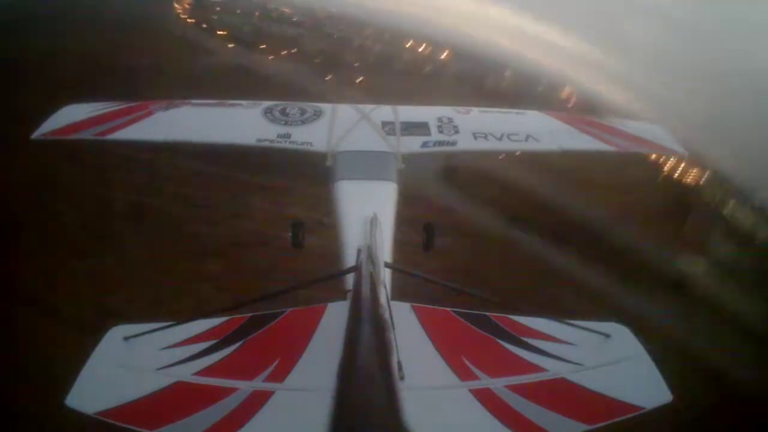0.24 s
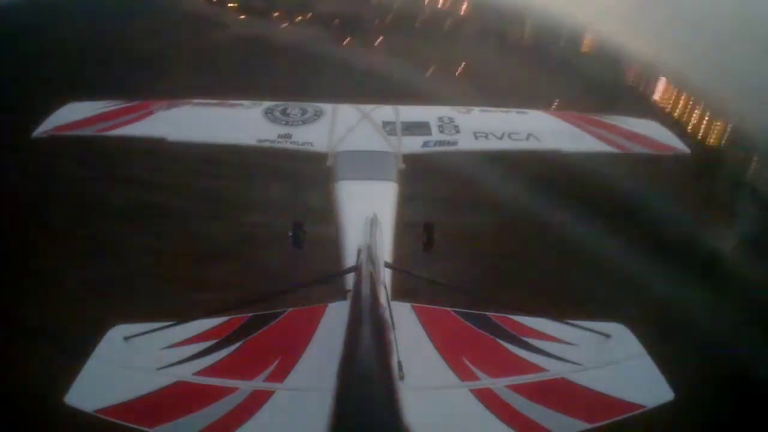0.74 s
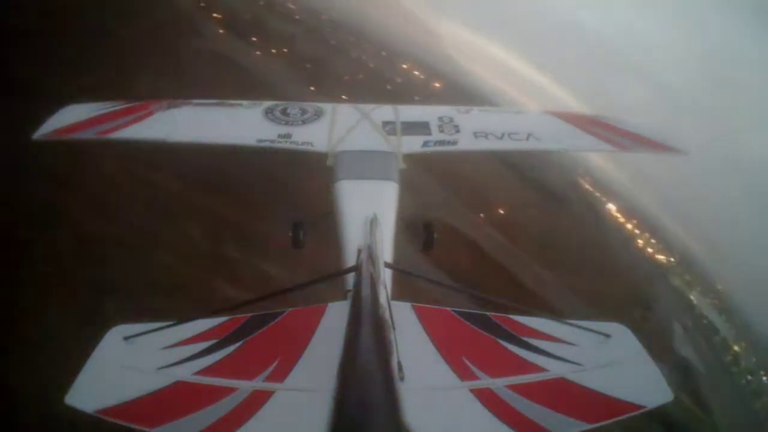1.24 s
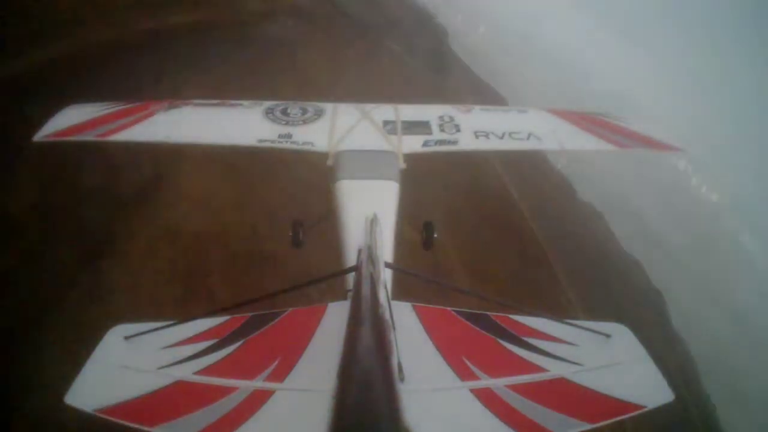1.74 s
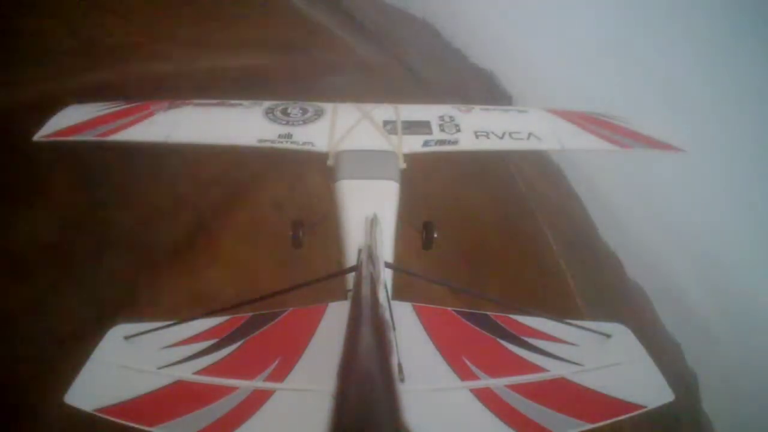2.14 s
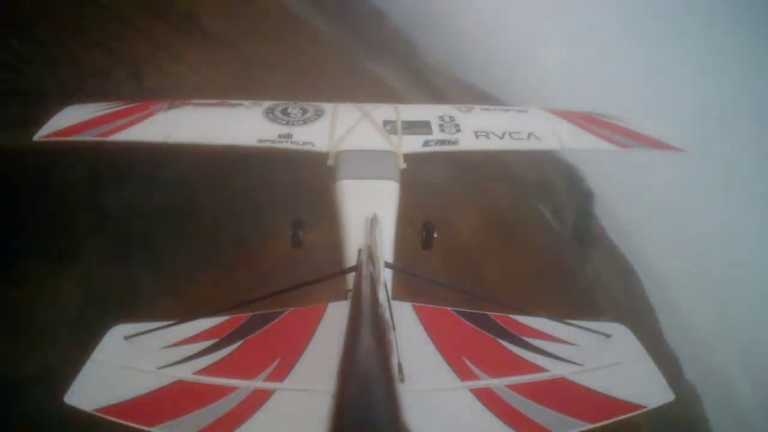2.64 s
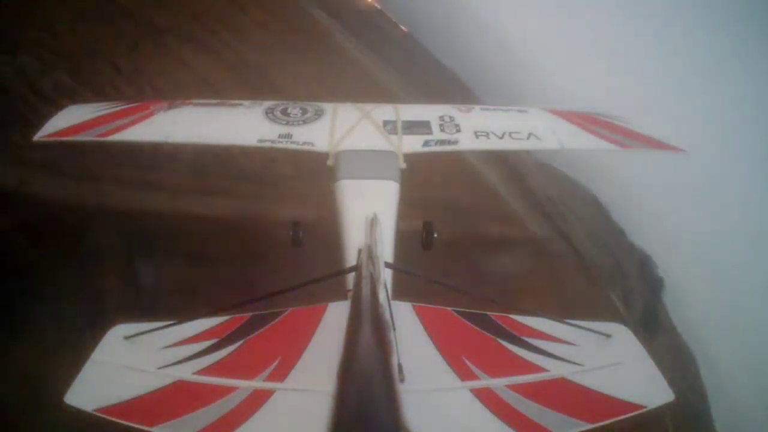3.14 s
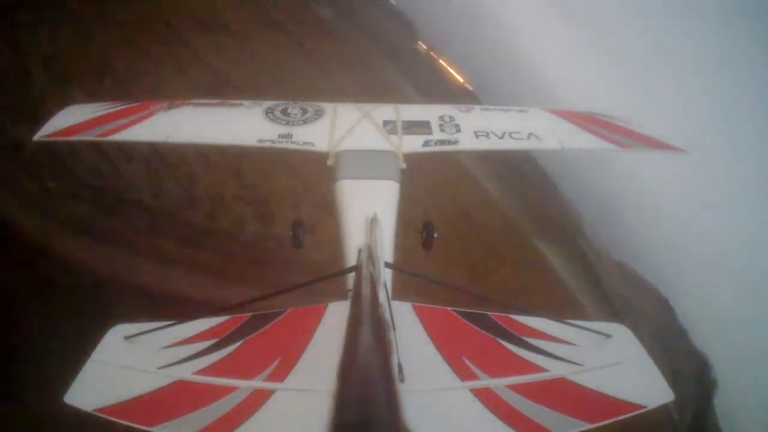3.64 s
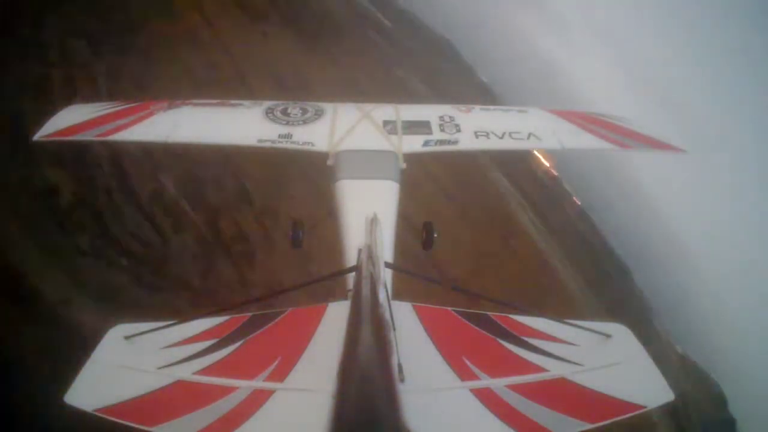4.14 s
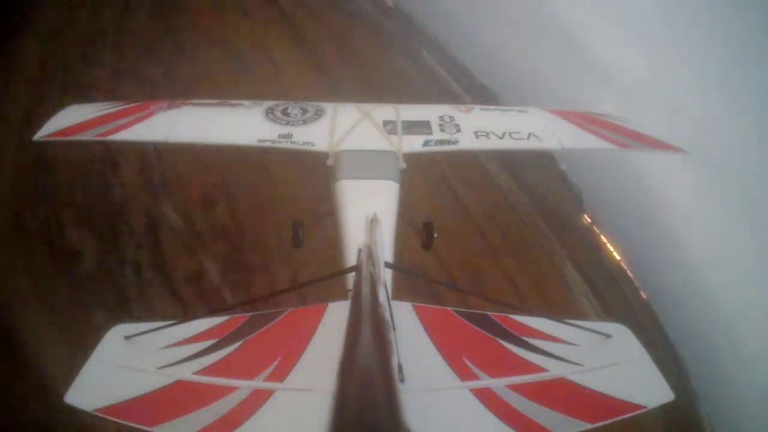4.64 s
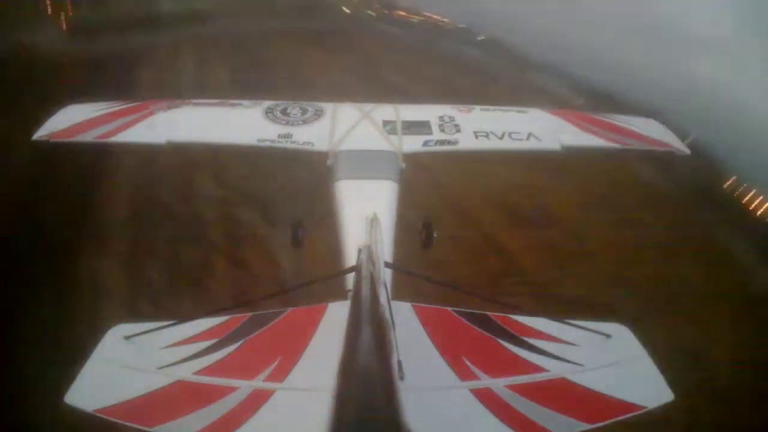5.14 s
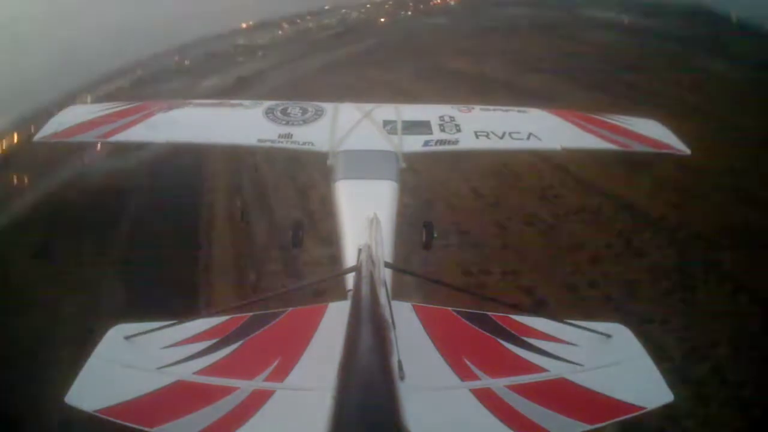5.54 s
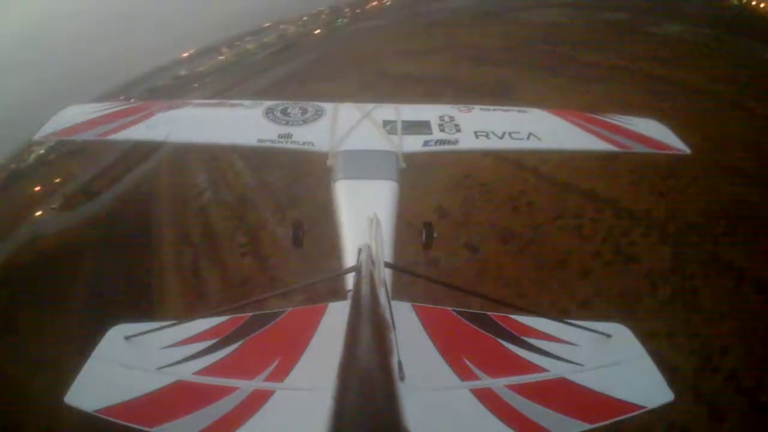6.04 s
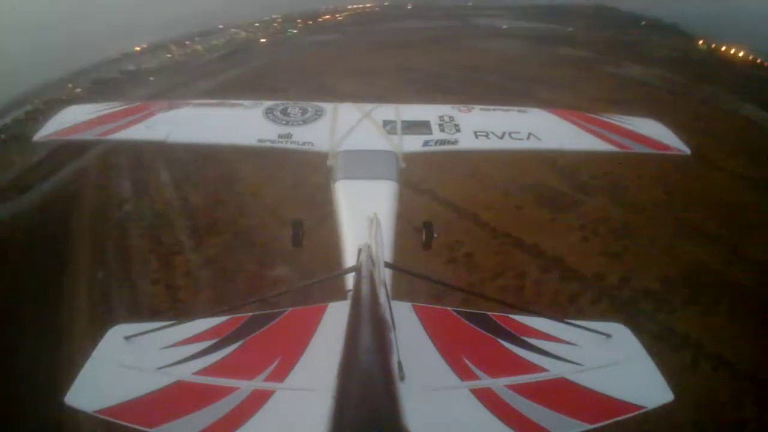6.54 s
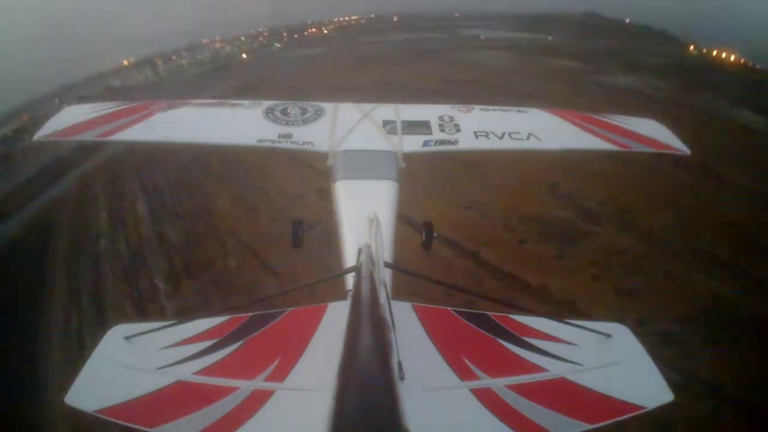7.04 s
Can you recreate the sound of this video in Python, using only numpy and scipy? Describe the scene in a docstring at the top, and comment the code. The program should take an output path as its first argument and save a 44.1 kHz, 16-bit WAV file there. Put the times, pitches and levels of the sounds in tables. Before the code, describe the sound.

An onboard microphone out in the open air catches loud propeller wash and hard, rapid clattering of a light airframe. The wash eases, the motor drops in pitch, and the clatter ends. After that, quieter flight: rumbling, fluttering wind, a gentle propeller hum, faint electric whine and hiss, and one gust that sings briefly in the airframe.

```python
"""Electric model plane in flight

Heard from a small camera on the tail: at high throttle the airframe rattles in bouts, once a shaft turn,
amid buffeting propeller wash. Then the throttle is pulled back and the rattle stops; a soft two-blade hum,
a thin controller whistle and gusty wind remain. Rattle is struck resonances and filtered ticks, hum and
whine are sines locked to one shaft angle, the whistle is a fixed sine, and the air is filtered noise.
"""
import sys
import numpy as np
from scipy import signal
from scipy.fft import rfft, irfft
from scipy.io import wavfile

SR = 44100
rng = np.random.default_rng(int(sys.argv[2]) if len(sys.argv) > 2 else 0)


def int16_out(signal):
    """Quantize to a 16-bit WAV file."""
    q = np.round(np.clip(np.atleast_2d(signal).T, -1, 1) * 32767)
    wavfile.write(sys.argv[1], SR, q.astype(np.int16))


N = 321489
TIME = np.arange(N) / SR
# shaft turns per second at high and at low throttle
FAST_HZ, SLOW_HZ = 138.85, 91.3
# the throttle is pulled back: when, and how long the shaft takes to slow
CUT_S, SPIN_DOWN_S = 1.7, 0.18


def amp(db):
    """Decibels to gain."""
    return 10 ** (np.asarray(db) / 20)


def unit(x):
    """Scales to rms 1."""
    return x / np.sqrt(np.mean(x ** 2) + 1e-20)


def curve(rows):
    """A time table, read at every sample."""
    t, value = np.transpose(rows)
    return np.interp(TIME, t, value)


def since(s):
    """Seconds gone by since a moment, zero before it."""
    return np.maximum(TIME - s, 0)


def swell(middle, length):
    """A smooth rise from 0 to 1 and back."""
    phase = np.clip((TIME - middle) / length, -0.5, 0.5)
    return np.cos(np.pi * phase) ** 2


def drift(hz):
    """Slow random wander of rms 1: noise rolled off above about the given rate."""
    f = np.fft.rfftfreq(N, 1 / SR)
    spectrum = rfft(rng.standard_normal(N)) / (1 + (f / hz) ** 4)
    return unit(irfft(spectrum, N))


def response(points, size=4096):
    """Causal, minimum-phase impulse response of energy 1 with the given colour."""
    f, db = np.transpose(points)
    hz = abs(np.fft.fftfreq(size, 1 / SR))
    log_gain = np.log(amp(np.interp(np.log(hz + 1), np.log(f), db)))
    spectrum = np.exp(np.conj(signal.hilbert(log_gain)))  # phase follows from the log gain
    h = np.fft.ifft(spectrum).real[:size // 2]
    return h / np.linalg.norm(h)


def ring(x, h):
    """Passes x through an impulse response."""
    return signal.oaconvolve(x, h)[:N]


def clicks(seconds, sizes):
    """Impulses at exact times, each shared between the two nearest samples."""
    out = np.zeros(N + 2)
    at = np.clip(seconds * SR, 0, N)
    first, fraction = at.astype(int), at % 1
    np.add.at(out, first, sizes * (1 - fraction))
    np.add.at(out, first + 1, sizes * fraction)
    return out[:N]


# colour of the microphone hiss: (f/Hz, relative level/dB per Hz)
HISS_COLOUR = [(3000, 3), (7000, 1), (8300, -18), (9200, 35.5), (10000, -30), (11000, 31), (12600, 32.5),
               (13200, -12), (14200, -19), (15000, -12)]


def microphone_hiss():
    """Constant electrical noise of the microphone, mostly treble."""
    return amp(-66.5) * unit(ring(rng.standard_normal(N), response(HISS_COLOUR)))


def turbulence(colour, flutter_db, flutter_hz, eddy_db):
    """Air noise of rms 1 that flutters as a whole and breaks into millisecond eddies."""
    lumps = amp(flutter_db * drift(flutter_hz) + eddy_db * drift(460))
    return unit(ring(rng.standard_normal(N) * lumps, response(colour)))


# colour of the propeller wash over the tail: (f/Hz, relative level/dB per Hz)
WASH_COLOUR = [(20, -19.5), (70, 2), (280, 0), (700, -4), (1100, -8.5), (1850, -5.5), (2500, -13),
               (3200, -22.5), (4200, -19), (5600, -31.5), (6700, -25.5), (7900, -43), (9200, -37.5),
               (14500, -51)]


def propeller_wash():
    """Turbulent slipstream over the tail: it holds, eases off, then dies away."""
    ease_db = 16 * since(0.94)  # dB per s
    end_db = 87 * since(1.444)
    wash = turbulence(WASH_COLOUR, flutter_db=1.1, flutter_hz=40.2, eddy_db=2.5)
    return amp(-23 - ease_db - end_db) * wash


# colour of the low buffeting: (f/Hz, relative level/dB per Hz)
BUFFET_COLOUR = [(8, -35), (22, -9.5), (45, -1.5), (110, 0), (170, -3), (300, -20), (700, -23), (2000, -52)]
# gusts that lift the buffeting: (middle t/s, length/s, lift/dB)
GUSTS = [(2.48, 0.93, 2.5), (3.12, 0.54, 4), (3.637, 0.57, 3), (4.2, .4, 3), (5.045, 0.36, 2.5),
         (5.573, .22, 4), (6.073, .35, 2), (6.94, 0.21, 4.5)]


def buffeting():
    """Low pressure swings of the steady airstream, lifted by each gust."""
    lift_db = sum(db * swell(middle, length) for middle, length, db in GUSTS)
    return amp(-35 + lift_db) * turbulence(BUFFET_COLOUR, flutter_db=0.5, flutter_hz=11, eddy_db=2.5)


# colour of the airstream past the camera case: (f/Hz, relative level/dB per Hz)
RUSH_COLOUR = [(60, -12.5), (230, 7.5), (400, 5), (650, 1.5), (950, -2.5), (1300, -1.5), (1820, -0.5),
               (2100, -5), (2400, -11), (3200, -17.5), (4200, -16.5), (5500, -25), (6700, -23.5),
               (7700, -35), (9200, -40.5), (14500, -67)]


def airstream_rush():
    """Broad turbulence noise past the camera case, slackening once."""
    lull_db = -2 * swell(middle=6.68, length=0.94)
    return amp(-31 + lull_db) * turbulence(RUSH_COLOUR, flutter_db=0.97, flutter_hz=37.3, eddy_db=1.58)


# colour of the singing gust: (f/Hz, relative level/dB per Hz)
SONG_COLOUR = [(900, -30), (1450, -17), (1780, 2), (2050, -6), (2600, -23), (5000, -45)]


def singing_gust():
    """One gust sings in the airframe: a swell of noise in a narrow resonant band."""
    song = turbulence(SONG_COLOUR, flutter_db=2, flutter_hz=40, eddy_db=1)
    return amp(-38.5) * swell(middle=5.35, length=0.52) * song


# the clearest crackles in the airflow, played 8.5 dB above these levels: (t/s, level/dB)
CRACKLES = [(0.8445, -31), (0.8834, -32), (2.9642, -45), (3.696, -46), (4.383, -40), (6.205, -40),
            (6.7486, -43)]
# colour of every crackle: (f/Hz, relative level/dB per Hz)
CRACKLE_COLOUR = [(1500, -22), (4000, 1), (6700, 10.5), (7800, -12), (9300, -1), (14000, -22)]


def crackle(per_s=25, faint_db=-47):
    """Brief broadband snaps in the airflow: a few bright ones among many faint ones."""
    seconds, db = np.transpose(CRACKLES)
    spread_db = 3 * np.minimum(rng.exponential(1, N), 3)  # faint_db is the softest
    faint = (rng.random(N) < per_s / SR) * amp(faint_db + spread_db)
    snap = response(CRACKLE_COLOUR)
    return ring(clicks(seconds, amp(db + 8.5)) + faint, snap / abs(snap).max())


def motor_whine(turns, throttle):
    """Magnets passing the stator whine at 42 times the shaft rate."""
    slow_db, fast_db = -62.5, -63
    cogging = np.sin(42 * 2 * np.pi * turns) * amp(1.5 * drift(3))
    return np.sqrt(2) * cogging * amp(slow_db + (fast_db - slow_db) * throttle)


def controller_whistle(turns):
    """The controller's switching whistles at a fixed pitch, pulsing in level with the shaft angle."""
    angle = 2 * np.pi * turns
    switch_hz = 7822.7
    chopping = np.interp(TIME, [1.15, 1.55], [0, 1])  # fades in ahead of the throttle cut
    ripple = 1 + 0.18 * np.cos(angle) + 0.19 * np.cos(2 * angle)
    return np.sqrt(2) * amp(-65) * chopping * ripple * np.sin(2 * np.pi * switch_hz * TIME)


# two-blade hum, rms before its random wander: (t/s, level/dB)
HUM = [(0, -34.5), (1.3, -37), (1.7, -53), (1.9, -37.5), (3.3, -37.5), (5.2, -37.8), (6.2, -43),
       (7.29, -39)]


def propeller(turns, throttle):
    """Two blades hum at twice the shaft rate; at speed, imbalance adds the shaft rate itself."""
    angle = 2 * np.pi * turns
    blades = np.sin(2 * angle + 0.2 * drift(8)) * amp(curve(HUM) + drift(7))
    overtone = np.sin(3 * angle + 0.5 * drift(14)) * amp(-49 + 0.98 * drift(4.5))
    imbalance = np.sin(angle + 0.17 * drift(15)) * throttle * amp(-39.5 + 2 * drift(2.4))
    return np.sqrt(2) * (blades + overtone + imbalance)


# bouts of rattle, levels ahead of the trims on blow and tick:
# (start t/s, end t/s, starting level/dB, growth/dB per s)
BOUTS = [(0, 0.307, -29, 7.5), (0.382, .7, -31.5, 13), (1.153, 1.357, -32, 0), (1.49, 1.74, -36, -34)]


def shaking():
    """Strength of the rattle: each bout builds up, grows or ebbs while it lasts, and dies quickly."""
    rise, fall = 88, 140  # dB per s
    levels_db = []
    for start, end, db, growth in BOUTS:
        grown_db = growth * np.clip(TIME - start, 0, end - start)
        before_db = rise * np.maximum(start - TIME, 0)
        after_db = fall * since(end)
        levels_db.append(db + grown_db - before_db - after_db)
    return amp(np.max(levels_db, axis=0))


def bend(x, hz, width_hz):
    """Bending waves travel down the tail at unequal speeds: an all-pass that spreads each click."""
    r = np.exp(-np.pi * width_hz / SR)
    poles = [1, -2 * r * np.cos(2 * np.pi * hz / SR), r * r]
    return signal.lfilter(poles[::-1], poles, x)


# hardest knocks of the airframe, peak ahead of the bending spread: (t/s, level/dB)
KNOCKS = [(.0297, -6), (.0585, -5), (.0727, -6), (.1085, -14), (.1301, -7.5), (.1517, -3), (.1661, -3),
          (.2023, -6.5), (.3892, -8), (.4685, -16), (.519, -8), (.591, -7.5), (.699, -11)]
# ringing modes of the airframe: (f/Hz, relative level/dB, 60 dB decay time/s)
AIRFRAME_MODES = [(1320, -25, 0.022), (1600, -4.5, 0.011), (1880, 10, 0.0091), (1990, -10, 0.042),
                  (2730, -8, 0.0058)]
# colour of the sharp contact tick: (f/Hz, relative level/dB per Hz)
TICK_COLOUR = [(300, -25), (1000, -9), (2000, -2), (2700, -3), (3250, -7), (3900, 1), (4550, -1),
               (5200, -14), (5800, -24), (6700, -15), (7700, -35), (10000, -39), (12500, -36), (14500, -45)]


def rattle(turns):
    """Once a turn loose parts touch: a sharp tick, and a ring that tends to go hard, soft, hard, soft."""
    at = np.flatnonzero(np.diff(np.floor(turns)) > 0)
    late, weight, sharp, slip = rng.standard_normal((len(at), 4)).T
    seconds = at / SR + 6e-5 * late
    size = shaking()[at] * np.sqrt(SR / FAST_HZ)  # turns an rms level into a click size

    t = np.arange(SR // 20) / SR
    body = sum(amp(db - 60 * t / t60) * np.sin(2 * np.pi * hz * t) for hz, db, t60 in AIRFRAME_MODES)
    body = body / np.linalg.norm(body)

    scatter_db = 2.8 * np.tanh(weight)
    hard_soft_db = 1.4 * (-1) ** np.arange(len(at))
    blows = size * amp(1 + scatter_db + hard_soft_db)
    knock_s, knock_db = np.transpose(KNOCKS)
    struck = abs(seconds[:, None] - knock_s).argmin(0)
    blows[struck] = amp(knock_db) / abs(body).max()  # a hard knock takes the place of that turn's blow

    uneven_db = 3.6 * np.tanh(sharp)
    ticks = clicks(seconds + 5e-5 * slip, size * amp(uneven_db - 5))
    contact = ring(ticks, response(TICK_COLOUR))
    return bend(contact + ring(clicks(seconds, blows), body), hz=2680, width_hz=1800)


def scene():
    """One shaft drives motor, propeller and rattle, all inside the wind."""
    throttle = 1 - np.minimum(since(CUT_S) / SPIN_DOWN_S, 1)
    speed = SLOW_HZ + (FAST_HZ - SLOW_HZ) * throttle
    turns = np.cumsum(speed * (1 + 0.0005 * drift(6))) / SR - 0.07
    wind = propeller_wash() + buffeting() + airstream_rush() + singing_gust()
    drive = motor_whine(turns, throttle) + controller_whistle(turns) + propeller(turns, throttle)
    mix = microphone_hiss() + wind + crackle() + drive + rattle(turns)
    return mix[None]


def record(dry):
    """The camera's band limit: a steep low-pass."""
    edge_hz = 14550
    low_pass = signal.firwin(301, edge_hz, window=("kaiser", 9), fs=SR)
    return signal.oaconvolve(dry, low_pass[None], "same")


dry = scene()
out = record(dry)
int16_out(out)
```